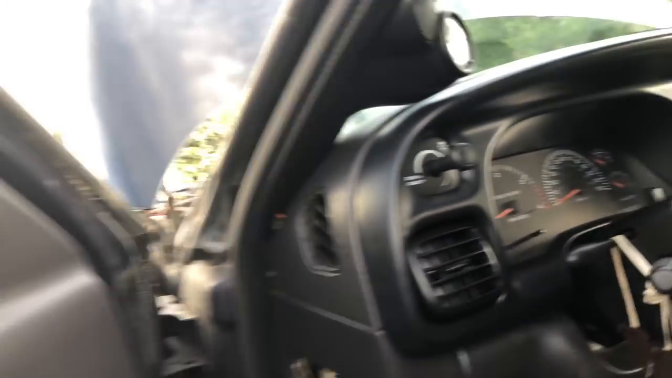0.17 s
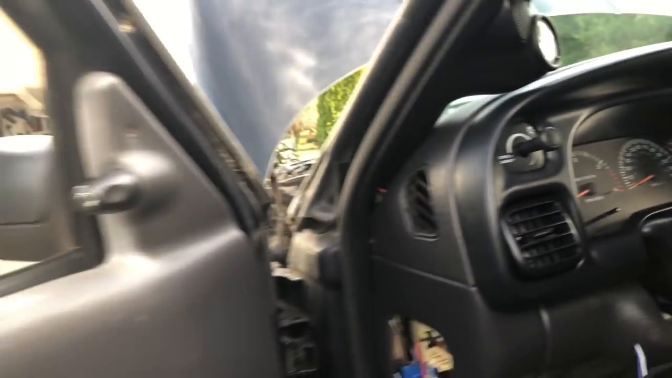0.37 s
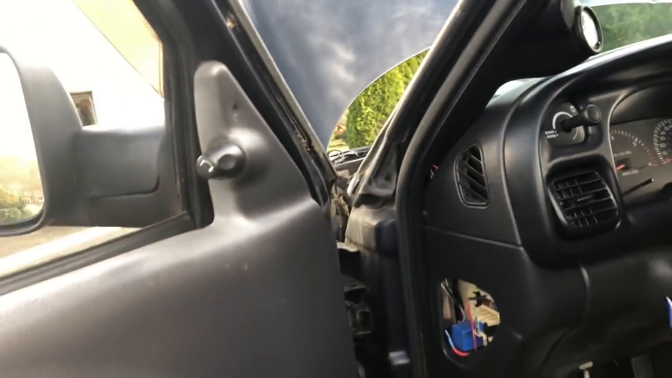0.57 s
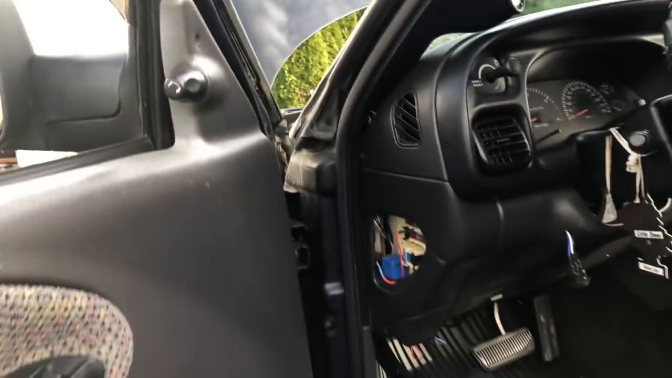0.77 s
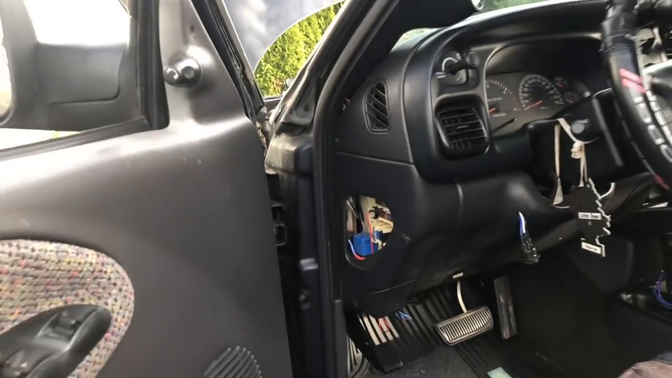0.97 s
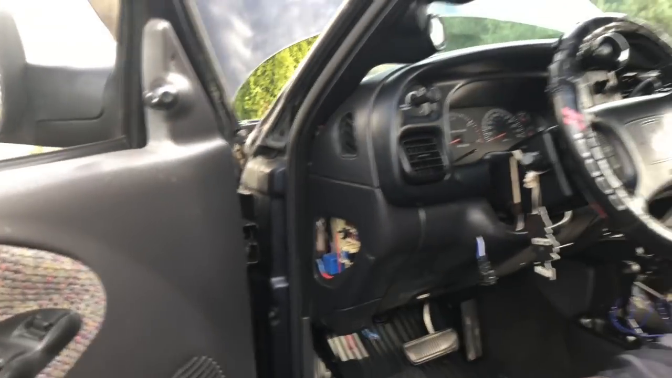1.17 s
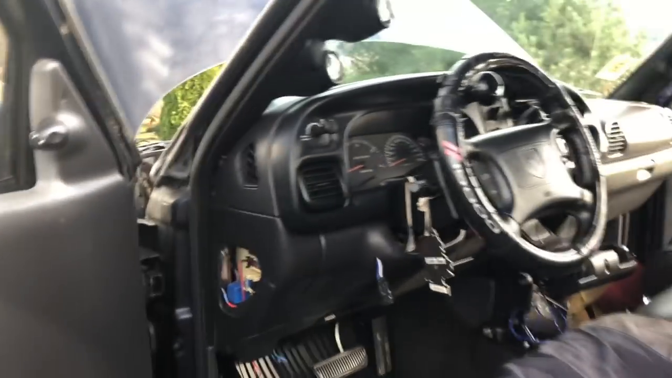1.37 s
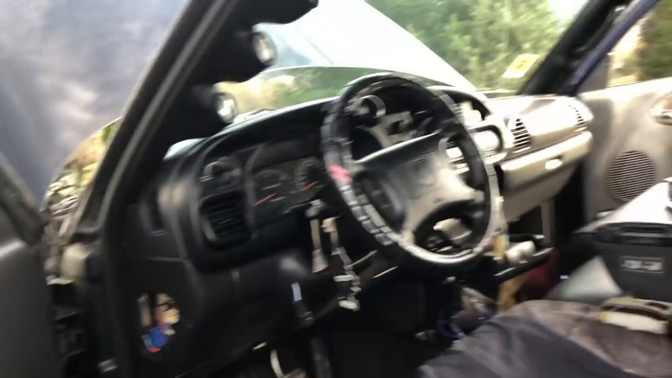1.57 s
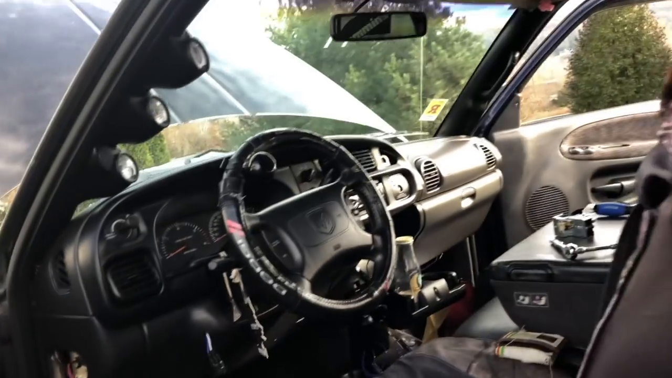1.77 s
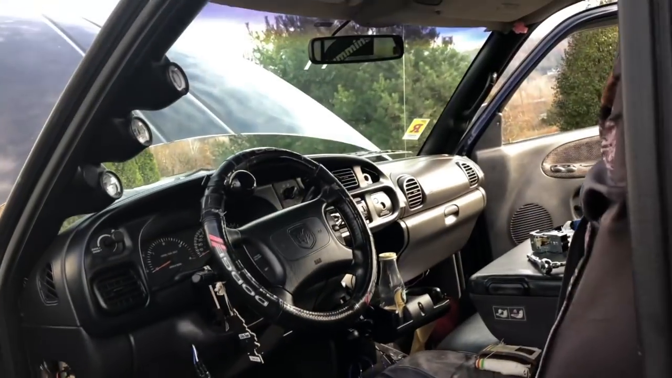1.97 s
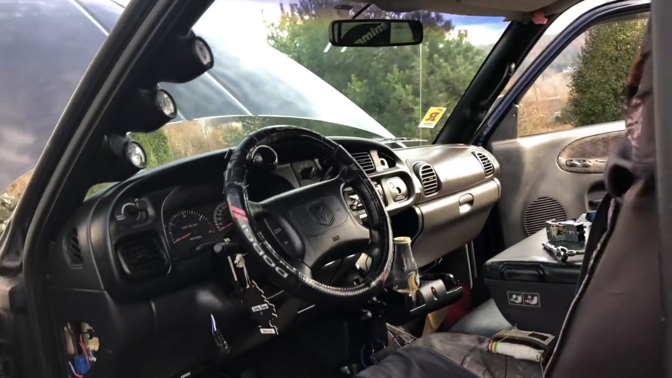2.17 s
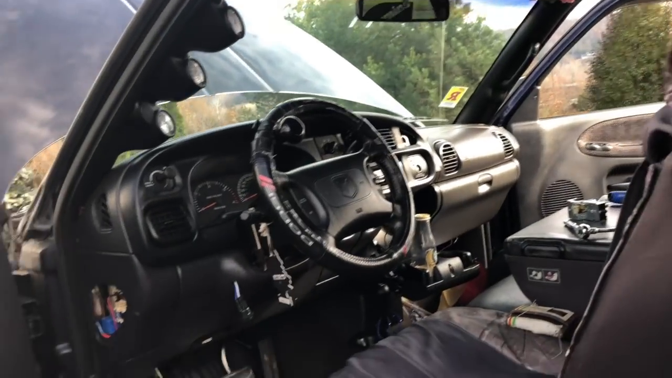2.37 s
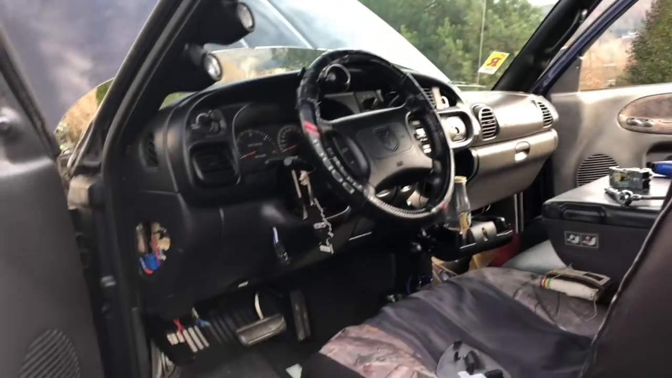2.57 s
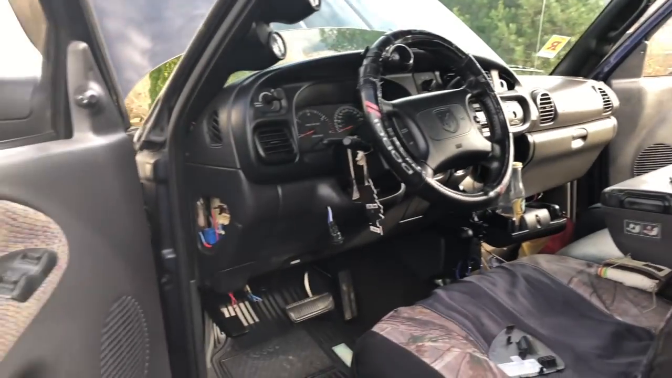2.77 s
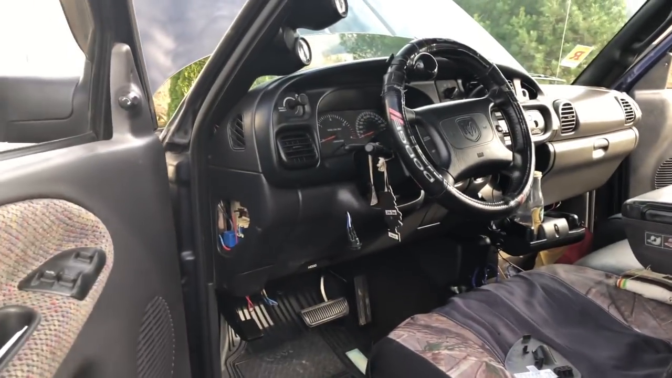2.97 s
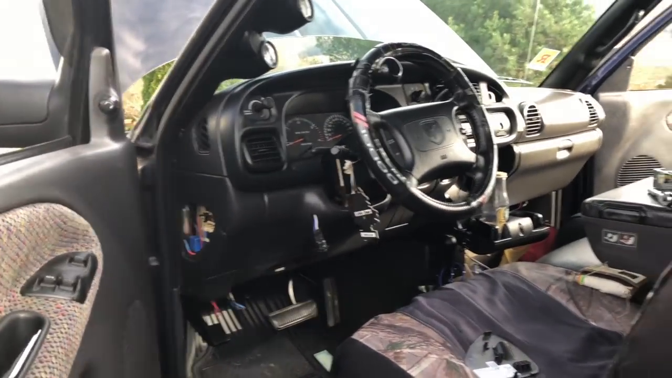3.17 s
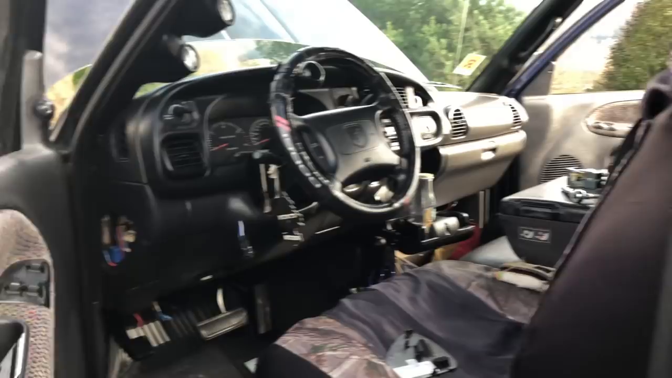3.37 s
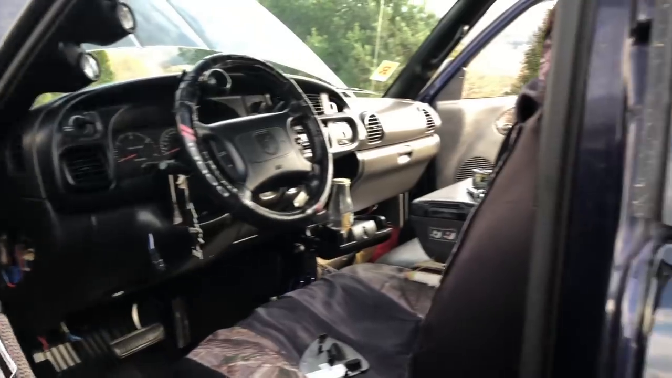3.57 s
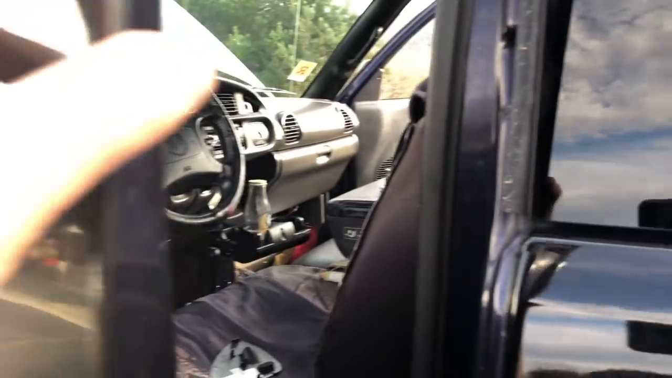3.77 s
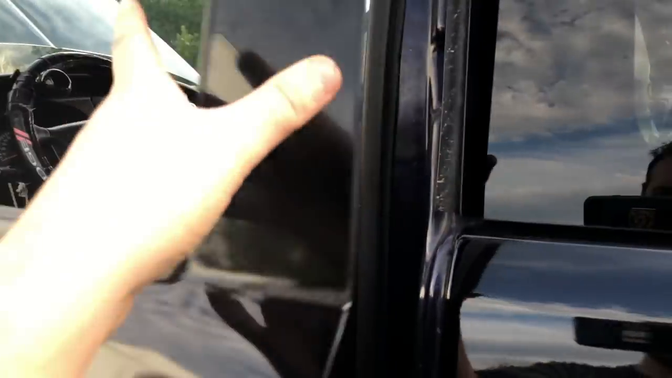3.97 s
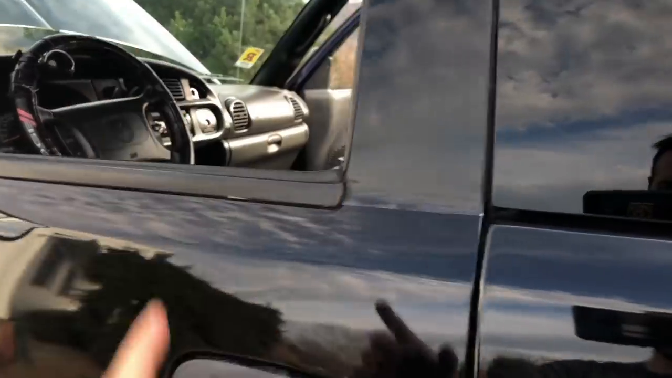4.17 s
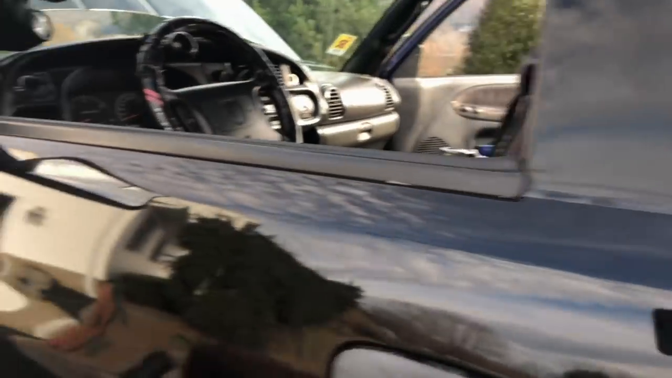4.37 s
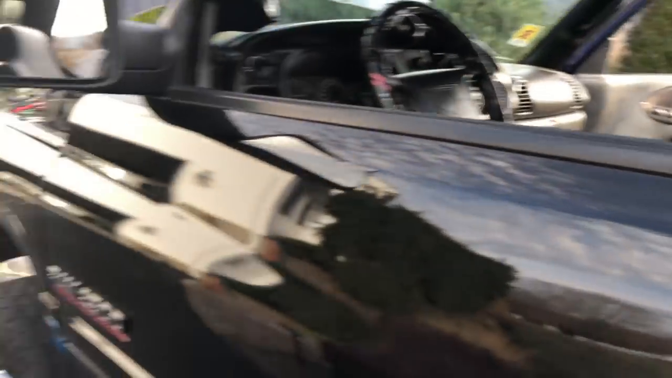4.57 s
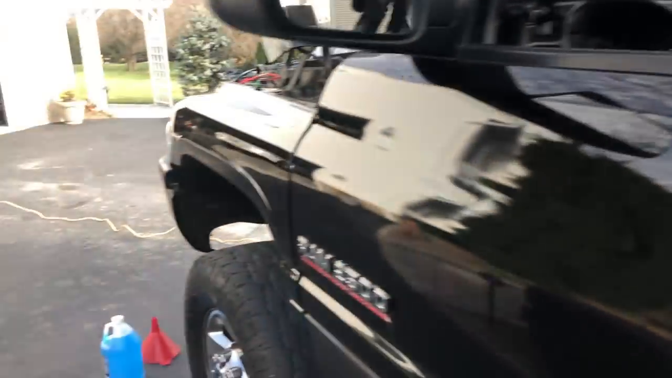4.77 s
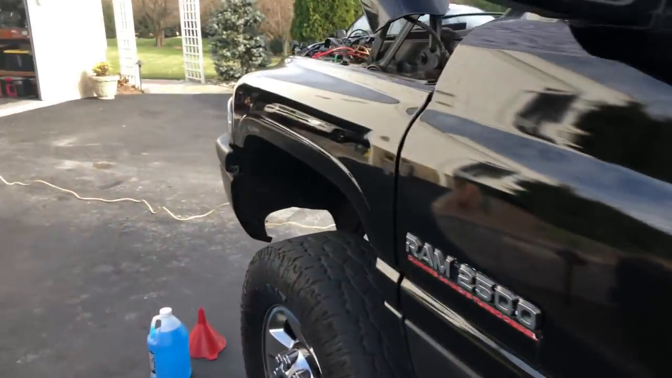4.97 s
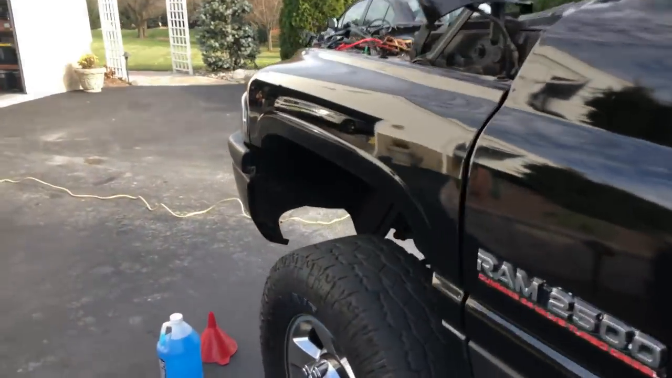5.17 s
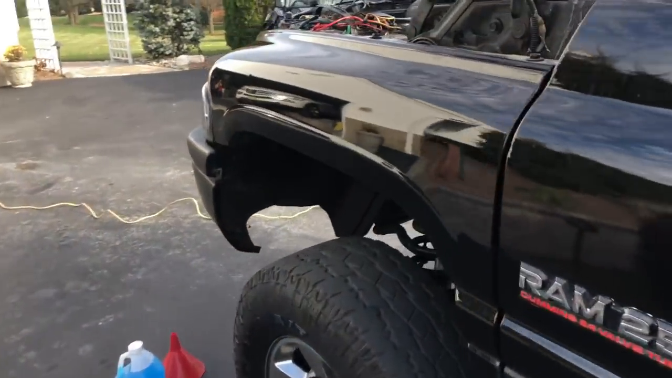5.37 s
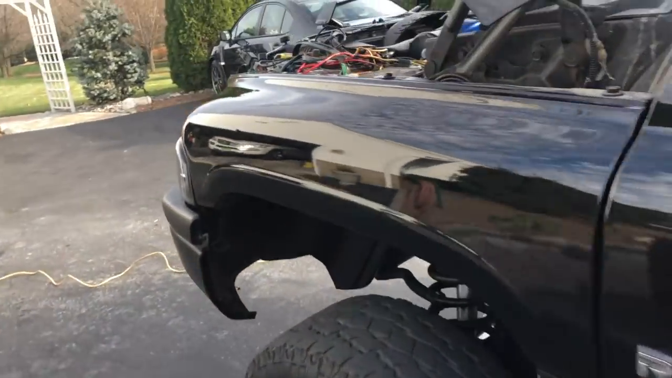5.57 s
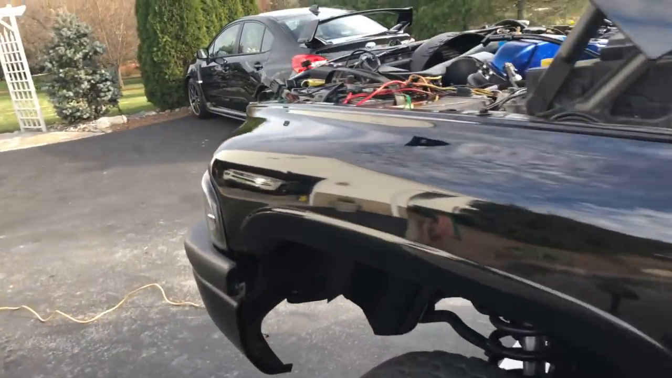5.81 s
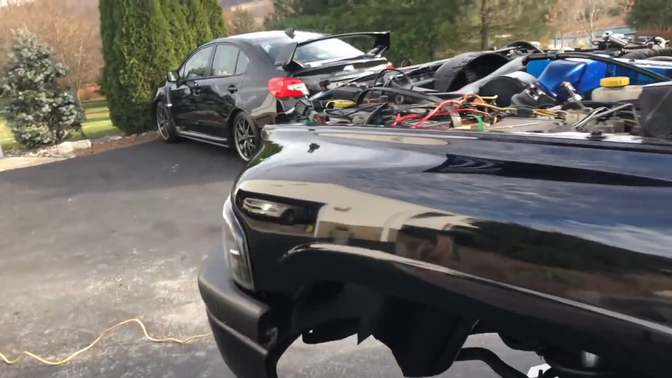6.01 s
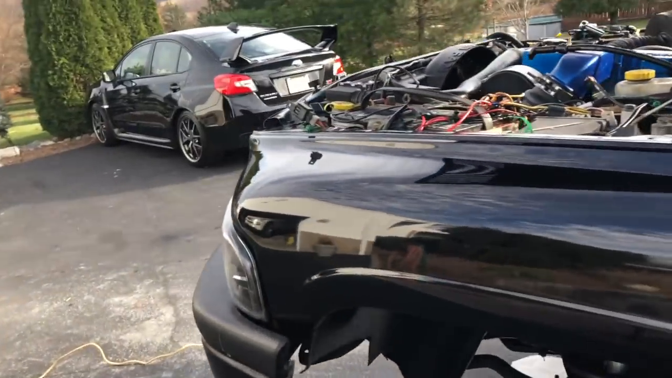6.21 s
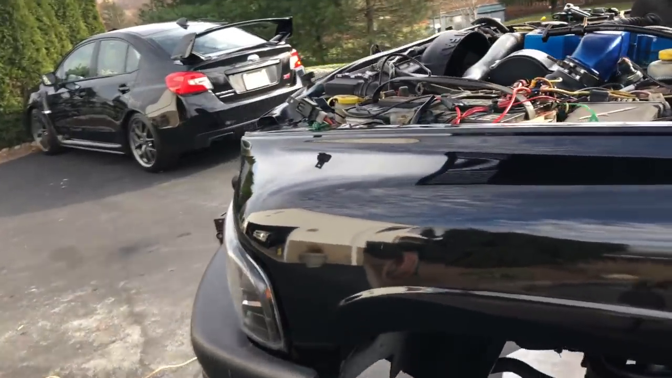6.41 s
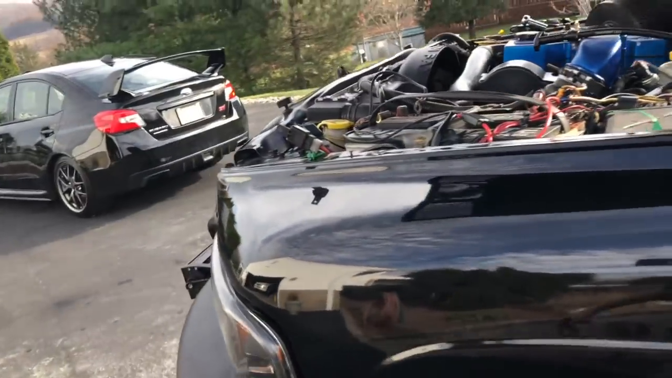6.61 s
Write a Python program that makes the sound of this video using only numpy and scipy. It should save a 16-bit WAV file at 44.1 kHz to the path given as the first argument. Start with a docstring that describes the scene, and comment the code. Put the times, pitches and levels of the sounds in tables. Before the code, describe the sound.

Someone moves about at a pickup's doorway outdoors: low dull thumps, a few dry ticks, brief scrapes of cloth or sole. Light hollow door knocks lead to one very loud, close steel door slam, with gritty cracks, panel shudder and loose-part rattle lasting under half a second. Dull yard echoes follow, then quiet handling noises over a distant hum, air hiss and a bass-thin microphone.

```python
"""A pickup's steel door slams close by on a quiet driveway, after someone backs out of the cab.
Blows ring the panel modes, gritty cracks come from latch and glass, and a shudder and rattle die away.
Around it padded bumps thump on seat and sill, noise grains make clothes rustle, small parts click and
the hollow door booms under a hand. Behind are a distant harmonic hum with a drone, two faint whistles,
far traffic rumble and air hiss. Near hits get dull yard echoes; the microphone adds hiss and cuts bass."""
import sys
import numpy as np
from scipy import signal
from scipy.fft import rfft, irfft
from scipy.io import wavfile

SR = 44100
rng = np.random.default_rng(int(sys.argv[2]) if len(sys.argv) > 2 else 0)


def nominal_scale(level):
    """Amplitude ratio for a level in decibels (scalar or array-like)."""
    x = np.asarray(level, float) / 20
    return 10 ** x


def wrap_up_sound(samples):
    """Save the sound to the file named by the first command line argument, as 16-bit audio."""
    columns = np.atleast_2d(samples).T
    # keep every value between -1 and 1, then stretch to whole-number steps
    tamed = np.clip(columns, -1, 1)
    steps = np.round(tamed * 32767).astype(np.int16)
    wavfile.write(sys.argv[1], SR, steps)


N = 293132   # samples


def rms_one(x):
    """Scale to rms 1."""
    return x / np.sqrt(np.mean(x ** 2) + 1e-20)


def noise():
    """White noise of rms about 1, as long as the scene."""
    return rng.standard_normal(N)


def in_time(rows):
    """Columns of a curve in seconds, interpolated at every sample."""
    s, *columns = np.transpose(rows)
    return [np.interp(np.arange(N) / SR, s, column, left=-120, right=-120) for column in columns]


def coloured(x, spectrum):
    """Filter a signal by a gain curve in dB, interpolated over log frequency."""
    hz, db = np.transpose(spectrum)
    grid = np.arange(len(x) // 2 + 1) * SR / len(x) + 1
    gain_db = np.interp(np.log(grid), np.log(hz), db)
    return irfft(rfft(x) * nominal_scale(gain_db), len(x))


def band(x, low_hz, high_hz):
    """Butterworth band-pass."""
    sos = signal.butter(2, [low_hz, min(high_hz, 0.45 * SR)], "band", fs=SR, output="sos")
    return signal.sosfilt(sos, x)


def drift(rate_hz):
    """Slow random wander of spread 1: low-passed noise drawn every 40 samples."""
    r = np.exp(-2 * np.pi * rate_hz * 40 / SR)
    steps = rng.standard_normal(N // 40 + 2002)
    slow = signal.lfilter([1], [1, -2 * r, r * r], steps)[2000:]   # skip the filter's start
    return np.interp(np.arange(N) / 40, np.arange(len(slow)), rms_one(slow))


def ring(clicks, hz, t60):
    """A resonator: a unit click starts a dying sine of height 1."""
    r, w = nominal_scale(-60 / (t60 * SR)), 2 * np.pi * hz / SR
    return signal.lfilter([0, np.sin(w)], [1, -2 * r * np.cos(w), r * r], clicks + 1e-18)


def sine(hz, count):
    """A steady sine of height 1."""
    return np.sin(2 * np.pi * hz * np.arange(count) / SR)


def dying(t60, rise_s):
    """Envelope of a hit: quick rise, exponential fall."""
    t = np.arange(int(t60 * SR)) / SR
    return (1 - np.exp(-t / rise_s)) * nominal_scale(-60 * t / t60)


def add(out, s, piece):
    """Mix a piece in at a time in seconds."""
    at = round(s * SR)
    out[at:at + len(piece)] += piece[:N - at]


def grains(per_s, spread_db):
    """Random clicks of uneven size and either sign, rms 1."""
    sizes = nominal_scale(spread_db * np.minimum(rng.exponential(1, N), 5))
    signed = sizes * rng.choice([-1, 1], N)
    return rms_one(signed * (rng.random(N) < per_s / SR))


# Far traffic, its loudness. Each row: time in seconds, rumble level in dB.
RUMBLE = [(0, -52), (.75, -54.5), (1.3, -50), (3.5, -52.5), (4.7, -50), (6.66, -55)]
# Far traffic, its colour. Each row: frequency in Hz, relative density in dB per Hz.
TRAFFIC = [(15, -29.5), (25, -15.5), (45, -1), (124, 2), (211, -6), (245, -8.5), (314, -24.5), (500, -27),
           (650, -46), (1100, -120)]
# Soft air hiss around the yard. Each row: frequency in Hz, relative density in dB per Hz.
AIR = [(180, -22), (300, 1), (526, -5), (1050, -8.5), (1670, -13), (4490, -24), (15500, -43)]
AIR_DB = -65.5


def outdoors():
    """Far traffic rumble and soft air hiss: coloured noises that wander in level."""
    rumble = rms_one(coloured(noise(), TRAFFIC))
    rumble_db = in_time(RUMBLE)[0] + 2.3 * drift(1.5)
    air = rms_one(coloured(noise(), AIR))
    return nominal_scale(rumble_db) * rumble + nominal_scale(AIR_DB + 0.7 * drift(2.5)) * air


# Distant motor, as it reaches the listener stepping out from behind the cab.
# Each row: time in seconds, first order's level in dB, second order in dB above the first.
HUM = [(0, -72.5, -20), (.9, -62, 4), (1.4, -63, -9.5), (4.75, -69.5, -3), (5.05, -51.5, -0.5),
       (5.4, -45, -13), (6.0, -48, -7.5), (6.25, -50, -17), (6.66, -48.5, -15.5)]
HUM_HZ, THIRD_ORDER_DB = 96.5, -19   # the third order is set against the second
DRONE_HZ, DRONE_WIDTH_HZ, DRONE_DB = 128, 1.6, -5   # level against the first order, before the swell
DRONE_SWELL_S, DRONE_SWELL_LENGTH_S, DRONE_SWELL_DB = 2.47, 0.18, 23


def motor():
    """A harmonic hum wavering a little, and a looser narrow-band drone that swells once on its own."""
    phase = 2 * np.pi * np.cumsum(HUM_HZ * (1 + 0.0038 * drift(0.66))) / SR
    first_db, above_db = in_time(HUM)
    second_db = first_db + above_db
    hum = np.zeros(N)
    for order, db in enumerate([first_db, second_db, second_db + THIRD_ORDER_DB], start=1):
        hum += np.sqrt(2) * nominal_scale(db + 0.55 * drift(4.4)) * np.sin(order * phase)
    half = DRONE_WIDTH_HZ / 2
    drone = rms_one(band(noise(), DRONE_HZ - half, DRONE_HZ + half))
    from_peak_s = np.arange(N) / SR - DRONE_SWELL_S
    swell_db = DRONE_SWELL_DB * np.exp(-(from_peak_s / DRONE_SWELL_LENGTH_S) ** 2)
    return hum + nominal_scale(first_db + DRONE_DB + swell_db) * drone


def soft_contacts(rows, reach, noisy):
    """Short low rings under dull puffs of noise; each row: seconds, dB, Hz, puff's t60 in seconds."""
    out, white = np.zeros(N), noise()
    for s, db, hz, t60 in rows:
        envelope, at = dying(t60, rise_s=0.5 / hz), round(s * SR)
        tone = sine(hz, len(envelope)) * envelope   # enveloped again below, so the ring dies first
        puff = rms_one(band(white[at:at + len(envelope)], hz * 0.71, hz * reach))
        add(out, s, nominal_scale(db) * envelope * (1.82 * tone + noisy * puff))
    return band(band(out, 30, 740), 30, 740)   # takes the top off


# Padded bumps on seat and sill, close by. Each row: start in seconds, level in dB, pitch in Hz.
THUMPS = [(0.229, -25.5, 136), (0.226, -27.5, 75), (0.241, -41, 477), (.295, -39, 293), (0.585, -37, 405),
          (1.162, -32.5, 116), (1.219, -35.5, 178), (1.253, -34, 306), (1.26, -30, 503),
          (1.259, -23.5, 128), (1.259, -27, 73.6), (1.385, -31, 147), (1.402, -34, 496),
          (1.406, -21.5, 196), (1.41, -29.5, 57.6), (1.42, -35, 148), (2.059, -36, 122), (2.135, -32, 123),
          (2.69, -42, 166), (3.0577, -22.5, 330)]
THUMP_CYCLES = 11.2   # the puff falls 60 dB within this many cycles


def thumps():
    """Padding kills each bump within a few cycles and leaves little noise."""
    rows = [(s, db, hz, THUMP_CYCLES / hz) for s, db, hz in THUMPS]
    return soft_contacts(rows, reach=1.95, noisy=0.3)


YARD_DB, YARD_T60_S, YARD_DELAY_S = -22, 0.085, 0.007


def yard(x):
    """Scattered dull echoes from ground, house and cars: convolution with dying noise."""
    scatter = band(rng.standard_normal(int(YARD_T60_S * SR)), 90, 4500)
    scatter = scatter * dying(YARD_T60_S, rise_s=0.008)
    out = np.zeros(N)
    add(out, YARD_DELAY_S, signal.fftconvolve(x, scatter / np.linalg.norm(scatter)))
    return nominal_scale(YARD_DB) * out


def chinks():
    """Random ticks dealt to 24 small parts, each ringing some fifty cycles at its own pitch; rms 1."""
    ticks, dealt = grains(per_s=5000, spread_db=3.0), rng.integers(0, 24, N)
    out = np.zeros(N)
    for part, hz in enumerate(np.geomspace(900, 15000, 24)):
        out += rms_one(ring(ticks * (dealt == part), hz, 50 / hz))
    return rms_one(out)


# Clothes and soles rubbing near the microphone. Each row: start in seconds, length in seconds,
# dull rasp in dB, bright swish in dB, share of the length spent swelling.
RUBS = [(0.401, 0.12, -67, -69, 0.28), (0.478, 0.11, -63.5, -65, 0.37), (0.586, 0.089, -70, -68.5, 0.45),
        (0.755, 0.064, -57.5, -70, 0.43), (1.766, 0.089, -59.5, -81, 0.5), (1.844, 0.097, -60.5, -74, 0.27),
        (3.218, 0.041, -65, -83, 0.18), (2.978, 0.53, -72, -91, .5), (3.064, 0.049, -55.5, -89, 0.1),
        (3.298, 0.032, -61, -85, 0.28), (3.33, 0.069, -66.5, -88, .2), (3.388, 0.13, -69.5, -82, 0.54),
        (3.498, 0.055, -63.5, -76.5, 0.34), (3.923, 0.19, -76, -77.5, 0.26), (4.634, 0.48, -75, -76, 0.22),
        (5.472, 0.03, -61.5, -80.5, .4), (5.487, 0.35, -72, -83.5, .45), (5.84, 0.038, -71, -68.5, 0.12),
        (5.883, 0.12, -58, -55.5, 0.045), (6.027, 0.33, -75.5, -75, 0.27), (6.445, 0.048, -61.5, -64, 0.31),
        (6.53, 0.085, -66, -78, 0.39)]
RASP_HZ, SWISH_HZ = (510, 2160), (3800, 12800)


def rustle():
    """Fibres slipping: a swell of dense grains in a dull rasp and a wide bright band."""
    out = np.zeros(N)
    fibres = (grains(per_s=9000, spread_db=2.5) + chinks()) * nominal_scale(1.6 * drift(60))
    for start, length, dull_db, bright_db, share in RUBS:
        piece = fibres[round(start * SR):round((start + length) * SR)]
        bend = np.log(0.5) / np.log(np.clip(share, 0.05, 0.9))   # puts the sine's peak at the share
        swell = np.abs(np.sin(np.pi * np.linspace(0, 1, len(piece)) ** bend))
        dull = rms_one(band(signal.lfilter([1], [1, -0.9], piece), *RASP_HZ))
        bright = rms_one(band(piece, *SWISH_HZ))
        add(out, start, swell * (nominal_scale(dull_db) * dull + nominal_scale(bright_db) * bright))
    return out


# A sole or sleeve scrapes and sings in one band.
# Each row: start in seconds, length in seconds, level in dB, pitch in Hz.
SCRAPES = [(0.437, .028, -66, 7500), (0.461, 0.054, -67.5, 5800), (1.849, 0.078, -58, 2500),
           (1.852, 0.064, -60.5, 890), (6.445, 0.034, -61.5, 2710)]


def scrapes():
    """Dense grains swelling in one broad resonance."""
    out = np.zeros(N)
    fibres = grains(per_s=9000, spread_db=2.5) * nominal_scale(2.0 * drift(50))
    for start, length, db, hz in SCRAPES:
        piece = fibres[round(start * SR):round((start + length) * SR)]
        singing = rms_one(band(piece, hz * 0.8, hz * 1.13))
        add(out, start, nominal_scale(db) * np.sqrt(np.hanning(len(piece))) * singing)
    return out


# Small hard clicks, close by.
# Each row: start in seconds, level in dB, pitch in Hz, treble tick in dB above the click.
CLICKS = [(0.572, -36, 1690, -6.5), (0.578, -35.5, 1520, 3), (0.579, -39, 14000, -30),
          (0.586, -31.5, 1450, -7.5), (0.782, -49.5, 1510, -8.5), (0.787, -45.5, 1280, -16),
          (1.593, -51, 860, -11), (1.664, -51, 1360, -7), (1.886, -53, 2460, -13),
          (1.923, -53.5, 2220, -11), (2.061, -48, 2020, -7), (3.013, -48, 710, -37), (3.056, -31, 530, -49),
          (3.057, -39, 1550, -26), (3.217, -43.5, 1060, -30), (4.856, -41, 910, -31),
          (5.427, -48.5, 800, -12.5), (5.437, -43.5, 784, -26.5), (5.543, -68, 3020, 10.5),
          (5.884, -44, 794, -5.5), (5.886, -43.5, 3470, -8), (6.009, -41, 1854, -23),
          (6.008, -37, 587, -37), (6.447, -51.5, 2565, -7.5), (6.467, -55.5, 2620, 0.5)]
# Colour of the treble tick. Each row: frequency in Hz, relative density in dB per Hz.
TICK = [(1500, -45), (2500, 5), (5500, 6), (9000, -4), (15500, -15.5)]
CLICK_T60_S = 0.029


def clicks():
    """A short ring and a noise burst around the click's pitch, a duller knock and a treble tick."""
    out, white = np.zeros(N), noise()
    knock = rms_one(band(noise(), 240, 990))
    treble = rms_one(coloured(noise(), TICK))
    envelope = dying(CLICK_T60_S, rise_s=0.000071)
    for s, db, hz, treble_db in CLICKS:
        at = round(s * SR)
        span = slice(at, at + len(envelope))
        burst = rms_one(band(white[span], hz * 0.72, hz * 1.295))
        body = 0.75 * burst + 0.77 * sine(hz, len(envelope))
        add(out, s, nominal_scale(db) * envelope * (body + 0.23 * knock[span] + nominal_scale(treble_db) * treble[span]))
    return out


# A hand meets the hollow door, which booms on. Each row: start in seconds, level in dB, pitch in Hz.
KNOCKS = [(2.997, -42.5, 265), (3.021, -36.5, 217), (3.067, -35, 230), (3.219, -43, 259),
          (3.337, -47.5, 307), (3.43, -44.5, 196), (3.451, -46, 215), (3.478, -46.5, 207)]
KNOCK_T60_S = 0.23   # of the puff


def knocks():
    """The hollow door booms on, with more noise against its ring than a padded bump."""
    rows = [(*knock, KNOCK_T60_S) for knock in KNOCKS]
    return soft_contacts(rows, reach=1.9, noisy=0.45)


SHUT_S = 4.19   # the door meets the frame; panel, trim and glass shake on and die away


def aftershake(db, rise_s, t60):
    """Envelope of the shaking that starts as the door shuts."""
    out = np.zeros(N)
    add(out, SHUT_S, nominal_scale(db) * dying(t60, rise_s))
    return out


# Latch and glass cracking in the slam. Each row: start in seconds, crack level in dB,
# dull part in dB above the crack, pitch in Hz where the crack is sharpest.
CRACKS = [(4.13, -47, 7.5, 4640), (4.184, -38, 5, 3010), (4.187, -38, 17.5, 1196), (4.19, -25.5, -10, 3260),
          (4.1994, -13.5, -4, 4600), (4.2028, -25, -9, 3480), (4.213, -22, -2, 10000),
          (4.2183, -19.5, 5.5, 3200), (4.2551, -17, -0.5, 6300), (4.2696, -26.5, 3.5, 1613),
          (4.283, -31.5, 0, 5450), (4.2988, -29, -12, 4500), (4.34, -32.5, 6.5, 4770),
          (4.384, -37, -7, 5860), (4.395, -51, 7, 7500), (4.4225, -47.5, 4, 7160), (4.459, -53, 10.5, 4300),
          (4.4819, -46, -21, 5600), (4.5122, -53, -3, 5880), (4.554, -70, 0, 6000), (4.566, -66, -2, 6040)]
# Colour of the crack's grit. Each row: frequency in Hz, relative density in dB per Hz.
CRACK = [(530, -23), (900, -2), (2720, -9), (6420, -22), (8960, -22), (15500, -34.5)]
# Colour of the rattle. Each row: frequency in Hz, filter gain in dB.
RATTLE = [(600, -27.5), (1000, 5), (3000, -1), (7000, -5.5), (15500, -13.5)]
# Small steel parts that ring in the rattle. A plain list of pitches in Hz.
LATCH_HZ = [3330, 4240, 4860, 5520, 6100, 6660, 7750]
CRACK_T60_S, SNAP_DB, SNAP_T60_S = 0.055, 1.5, 0.021   # snap level against its crack
RATTLE_DB, RATTLE_RISE_S, RATTLE_T60_S = -16, 0.12, 0.41
LATCH_DB, LATCH_T60_S = -10, 0.05   # level against the rattle


def latch():
    """Cracks are short gritty bursts with a pitched snap; then a hail of ticks rings the steel parts."""
    bright, dull, snaps = np.zeros(N), np.zeros(N), np.zeros(N)
    white, snap = noise(), dying(SNAP_T60_S, rise_s=0.001)
    for s, crack_db, dull_db, hz in CRACKS:
        add(bright, s, nominal_scale(crack_db) * dying(CRACK_T60_S, rise_s=0.0026))
        add(dull, s, nominal_scale(crack_db + dull_db) * dying(CRACK_T60_S, rise_s=0.0015))
        burst = white[round(s * SR):][:len(snap)]
        pitched = rms_one(band(burst, hz * 0.62, hz * 1.35))
        add(snaps, s, nominal_scale(crack_db + SNAP_DB) * snap * pitched)
    grit = coloured(grains(per_s=7700, spread_db=3.5), CRACK)
    bright_grit = rms_one(band(grit, 1900, 18000))
    dull_grit = rms_one(band(grit, 490, 2500))
    cracks = bright * bright_grit + dull * dull_grit + snaps

    parts = np.zeros(N)
    for hz in LATCH_HZ:
        parts += ring(grains(per_s=40, spread_db=4.0), hz, LATCH_T60_S) * 4000 / hz
    rattle = rms_one(coloured(chinks() + grains(per_s=12000, spread_db=2.0), RATTLE))
    shaking = aftershake(RATTLE_DB, RATTLE_RISE_S, RATTLE_T60_S) * nominal_scale(2.2 * drift(60))
    return cracks + shaking * (rattle + nominal_scale(LATCH_DB) * rms_one(parts))


# Blows of the closing door on its panel.
# Each row: start in seconds, strength in dB, pitch in Hz of the modes that the blow favours.
BLOWS = [(4.139, -40.5, 221), (4.189, -21.5, 654), (4.189, -19.5, 363), (4.205, -16, 655),
         (4.213, -23, 109), (4.222, -20.5, 403), (4.226, -16, 850), (4.232, -8, 81), (4.2595, -16.5, 348),
         (4.264, -21, 87.2), (4.277, -18, 135), (4.284, -22.5, 135.2), (4.281, -24.5, 312),
         (4.299, -13, 69.2), (4.322, -21, 1490), (4.337, -11, 1950), (4.352, -26, 189), (4.356, -23, 556),
         (4.369, -31, 278), (4.378, -34, 150), (4.392, -35.5, 169), (4.403, -20.5, 1700),
         (4.407, -29, 1070), (4.411, -33, 158), (4.479, -43, 153), (4.51, -40, 170), (4.528, -45, 182),
         (4.548, -47.5, 140)]
# Door panel and cab modes. Each row: frequency in Hz, level in dB, t60 in seconds.
DOOR = [(55, 2, 0.05), (89, -4.5, 0.078), (105, 3, 0.055), (140, 3.5, 0.086), (178, 7, 0.079),
        (192, -2, 0.035), (250, 3, 0.14), (292, -4.5, 0.19), (341.7, 2.5, 0.073), (365, -1, 0.1),
        (464, 2, 0.025), (564, -4, 0.065), (654.5, 0.5, 0.042), (783, -6, 0.06), (844, -10, 0.075),
        (1030, -12.5, 0.07), (1158, -13, .08), (1504, -10.5, 0.034), (1760, -12, 0.045)]
REACH_OCTAVES = 0.45   # how far a blow reaches from its own pitch
SHUDDER_DB, SHUDDER_RISE_CYCLES, SHUDDER_T60_S = -64, 2.5, 0.55   # level of the drive
SHUDDER_TILT = 0.36   # the drive grows with mode frequency to this power


def door_panel():
    """Each blow rings the modes near its own pitch; the shudder keeps all modes going."""
    s, strength_db, favoured_hz = np.transpose(BLOWS)
    at, out = np.round(s * SR).astype(int), np.zeros(N)
    shudder = grains(per_s=1500, spread_db=3.0)
    for hz, level_db, t60 in DOOR:
        swelling = aftershake(SHUDDER_DB, SHUDDER_RISE_CYCLES / hz, SHUDDER_T60_S)   # low modes rise slower
        tilt = (hz / 100) ** SHUDDER_TILT / np.sqrt(t60)   # long rings need less drive
        drive = swelling * shudder * tilt * rng.choice([-1, 1], N)
        octaves = np.log2(hz / favoured_hz)
        drive[at] += nominal_scale(strength_db) * np.exp(-(octaves / REACH_OCTAVES) ** 2)
        out += nominal_scale(level_db) * ring(drive, hz, t60)
    return band(out, 50, 2600)   # keeps the panel's sound low and dull


# Faint whistles. Each row: start in seconds, end in seconds, first pitch in Hz, last pitch in Hz,
# level in dB.
WHISTLES = [(4.582, 4.675, 1388, 1430, -65.5), (5.8, 6.2, 1220, 1205, -67)]


def whistles():
    """Thin gliding tones, faded in and out, wavering in level."""
    out, waver = np.zeros(N), nominal_scale(2.0 * drift(25))
    for start, end, from_hz, to_hz, db in WHISTLES:
        count = int((end - start) * SR)
        tone = np.sin(2 * np.pi * np.cumsum(np.linspace(from_hz, to_hz, count)) / SR)
        add(out, start, nominal_scale(db) * np.sqrt(np.hanning(count)) * tone)
    return out * waver


def scene():
    """Near hits with their yard echoes, over the dry rubbing and the background; one channel."""
    near = thumps() + clicks() + knocks() + latch() + door_panel()
    background = outdoors() + motor() + whistles()
    return (near + yard(near) + rustle() + scrapes() + background)[None]


def band_limit(x):
    """A steep low-pass at the top of the band."""
    return signal.sosfilt(signal.butter(12, 16810, fs=SR, output="sos"), x)


MIC_HISS_DB, CEILING, TOP_HZ = -86, 0.52, 16600   # hiss before the filters; ceiling of full scale 1


def record(dry):
    """The microphone adds hiss and cuts bass steeply; peaks bend under a ceiling, then the top is cut."""
    hissing = dry + nominal_scale(MIC_HISS_DB) * noise()
    mic = band(band(hissing, 38, 19000), 38, 19000)
    squeezed = mic / (1 + np.abs(mic / CEILING) ** 6) ** (1 / 6)
    low_pass = signal.cheby2(20, 60, TOP_HZ, fs=SR, output="sos")
    finished = signal.sosfilt(low_pass, squeezed)
    return band_limit(finished)


dry = scene()
out = record(dry)
wrap_up_sound(out)
```